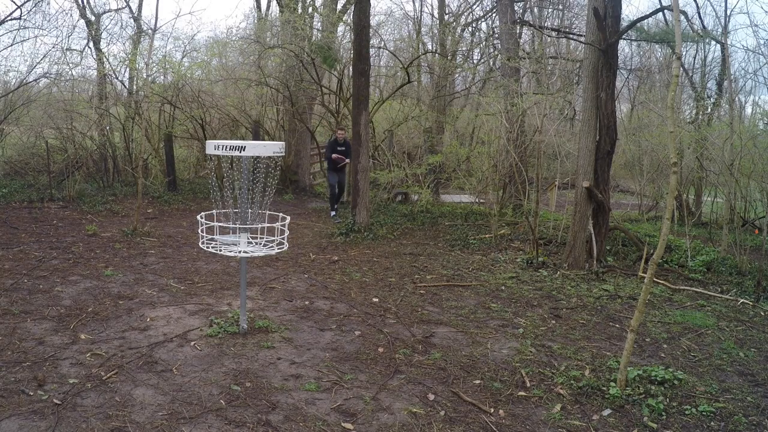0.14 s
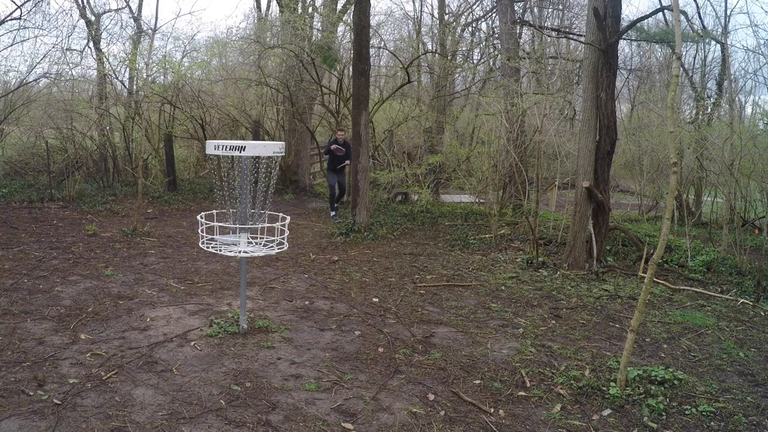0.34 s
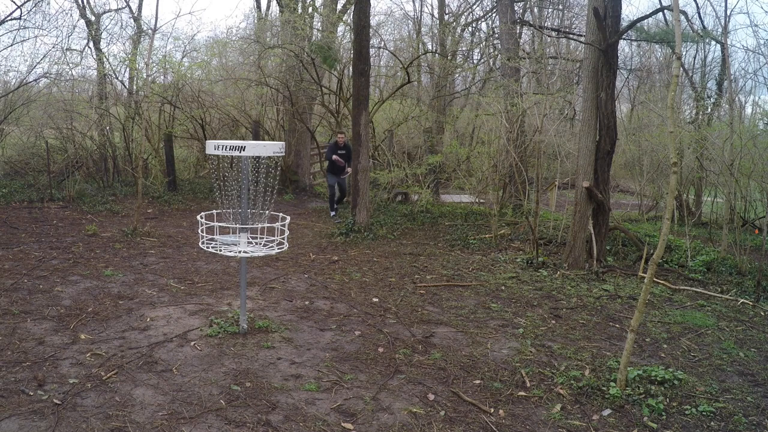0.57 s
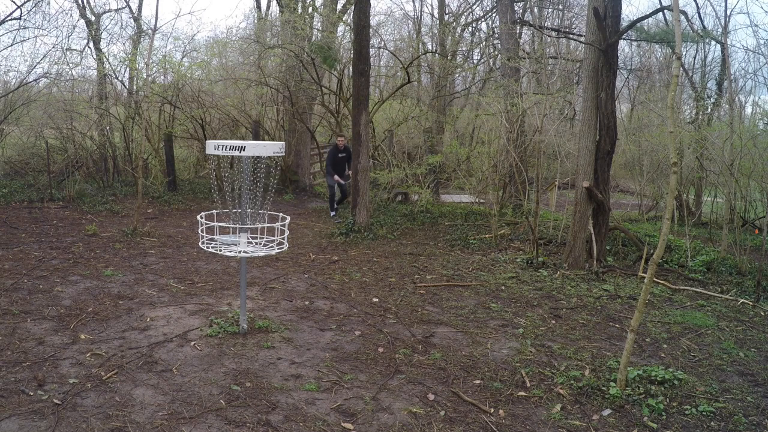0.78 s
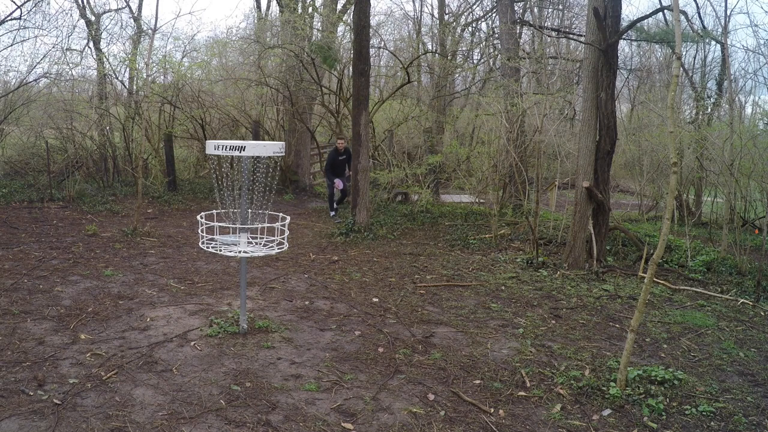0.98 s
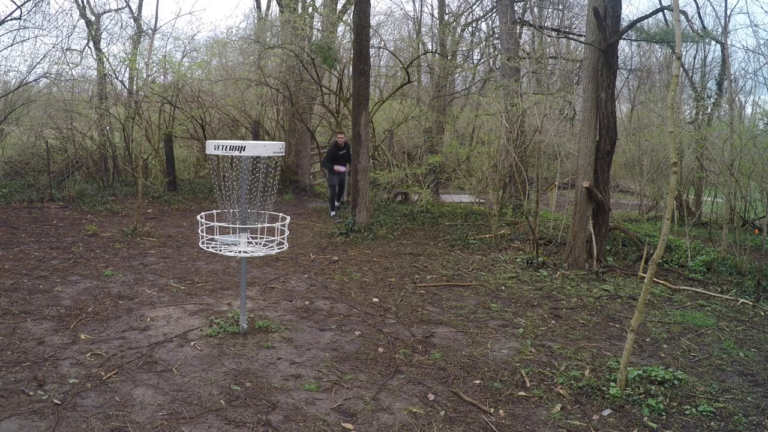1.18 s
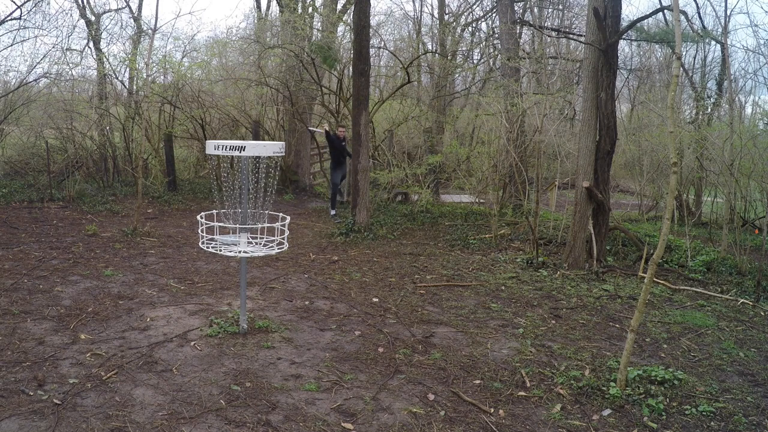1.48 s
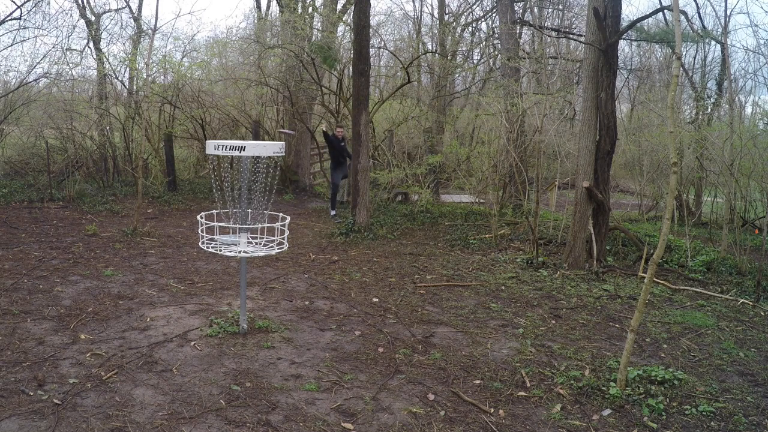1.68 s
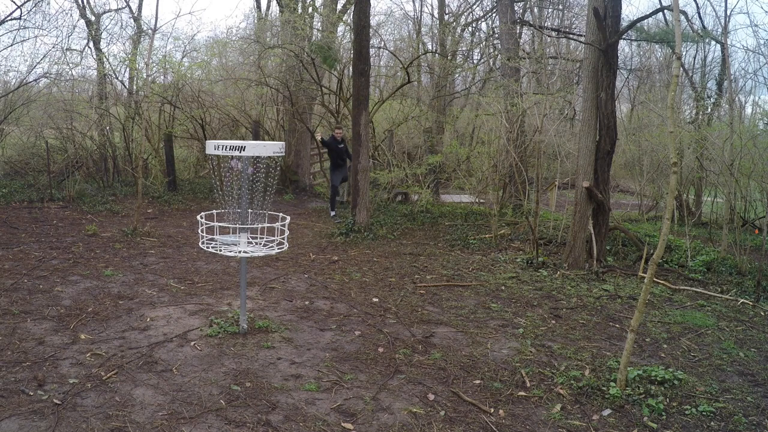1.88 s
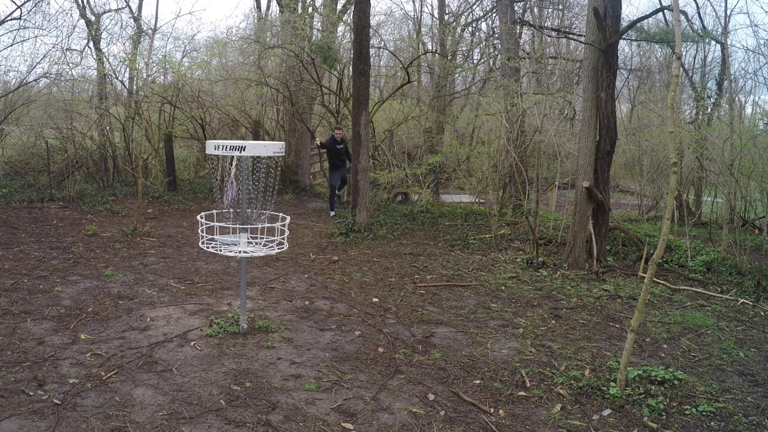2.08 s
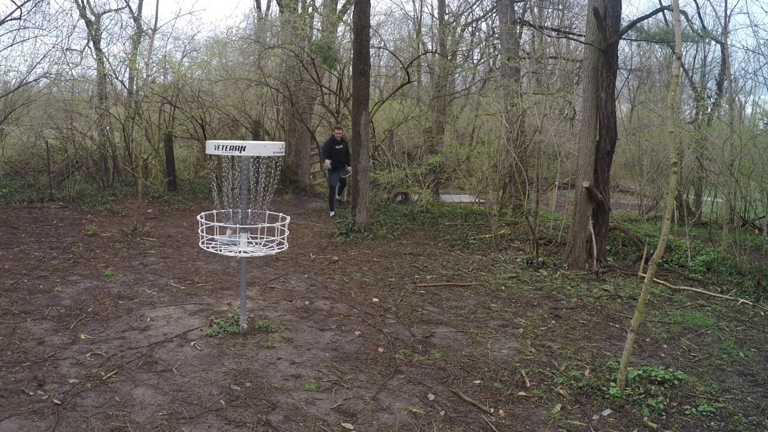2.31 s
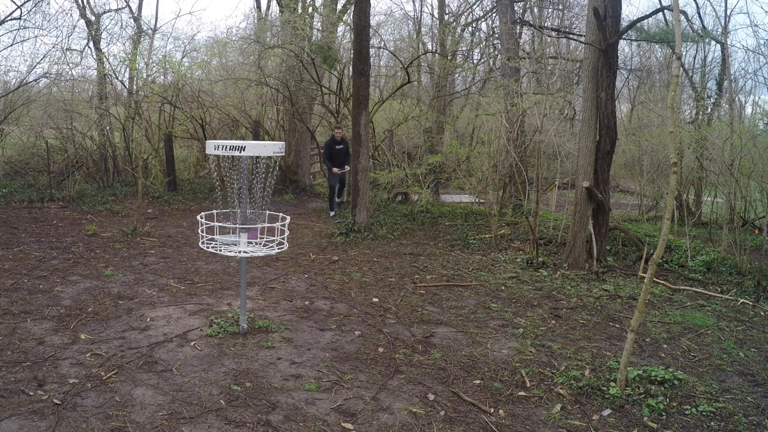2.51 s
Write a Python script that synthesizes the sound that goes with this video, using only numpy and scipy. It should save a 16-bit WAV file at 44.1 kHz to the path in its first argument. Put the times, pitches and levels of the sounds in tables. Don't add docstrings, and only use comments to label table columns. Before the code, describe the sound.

A plastic disc hits the steel chains of a basket with a sharp clashing jangle, knocks down into the tray and settles; before it, faint chain ticks and distant birds in a wood, microphone near the basket.

```python
import sys
import numpy as np
from scipy import signal
from scipy.fft import rfft, irfft, next_fast_len
from scipy.io import wavfile
from scipy.ndimage import map_coordinates

SR = 44100
rng = np.random.default_rng(int(sys.argv[2]) if len(sys.argv) > 2 else 0)


def volts_from_db(level):
    exponent = np.asarray(level, float) / 20
    return 10 ** exponent


def generate_wav(signal):
    frames = np.transpose(np.atleast_2d(signal))
    scaled = np.clip(frames, -1, 1) * 32767
    pcm = np.round(scaled).astype(np.int16)
    wavfile.write(sys.argv[1], SR, pcm)


N = 116865

LINK_HZ = [7830, 8250, 8620, 9080]
BRIGHT_HZ = [12700, 13450, 14500]
HOOK_HZ = [9860, 14500]
RING_HZ = [6790, 6910, 7050, 8750]
# (spread between pieces [Hz], level [dB], t60 [s])
LINK = [(67, 8, 0.046), (193, -4, 0.066), (98, 3, 0.018), (119, -6, 0.035)]
BRIGHT = [(364, -6, 0.04), (257, -5, 0.039), (110, -1.5, 0.042)]
HOOK = [(69.5, -2.3, 0.095), (70.4, -0.61, 0.062)]
RING = [(55.6, -26, 0.57), (50, -6, 0.063), (38, 6.5, 0.022), (199, -16, 0.074)]
# (frequency [Hz], density [dB per Hz])
CRACK = [(1500, -24), (2400, -4.5), (6400, -2), (8300, -2), (10500, -9), (13500, -6), (15300, -28)]
CRACK_T60_S = 0.018
RISE_S = 0.0009


def unit(x):
    return x / np.sqrt(np.mean(x ** 2) + 1e-20)


def along(points, hz):
    f, v = np.transpose(points)
    return np.interp(np.log(hz + 1), np.log(f + 1), v)


def curves(rows, t):
    s, *cols = np.transpose(rows)
    return [np.interp(t, s, c) for c in cols]


def wander(t, per_s, knots):
    return map_coordinates(rng.standard_normal(knots), [t * per_s])


def noise(spectrum, size):
    z = rfft(rng.standard_normal(next_fast_len(size + 8192)))
    hz = np.linspace(0, SR / 2, len(z))
    return unit(irfft(z * volts_from_db(along(spectrum, hz))))[:size]


def impulses_at(s):
    return np.clip(s * SR, 0, N - 1).astype(int)


def bursts(rows, count=3, gap_s=0.003, fade_db=4):
    s, *levels = np.transpose(rows)[:, :, None]
    luck, k = rng.random((len(rows), 2, count)), np.arange(count)
    late = np.cumsum(2 * gap_s * luck[:, 0] * (k > 0), axis=1)
    weaker_db = fade_db * k + 6 * luck[:, 1] * (k > 0)
    return [(s + late).ravel()] + [(db - weaker_db).ravel() for db in levels]


def struck(hz, modes, s, db, count=12, flutter_db=5):
    flutters_per_s, strike_db = 120, 2
    hz, spread, level, t60 = np.vstack([hz, np.transpose(modes)]).astype("f")[:, None, :, None]
    t = np.arange(SR // 3, dtype="f") / SR
    level_luck, pitch_luck, decay_luck = rng.standard_normal((3, count, len(modes), 1), "f")

    knots = rng.standard_normal((count, len(modes), SR // 1000), "f")
    at = t * flutters_per_s
    i, part = at.astype(int), at % 1
    flutter = knots[..., i] * (1 - part) + knots[..., i + 1] * part

    decay_db = 60 * t / (t60 * volts_from_db(decay_luck))
    mode_db = level + strike_db * level_luck + flutter_db * flutter - decay_db
    tone = np.sin(np.float32(2 * np.pi) * (hz + spread * pitch_luck) * t)
    rings = (np.exp(np.float32(np.log(10) / 20) * mode_db) * tone).sum(axis=1)
    rings = rings * (1 - np.exp(-t / RISE_S)) * (1 - (t / t[-1]) ** 2)
    rings = rings / np.abs(rings).max(axis=1)[:, None]

    blows, m = np.zeros((count, N)), next_fast_len(N + SR // 3)
    np.add.at(blows, (np.arange(len(s)) % count, impulses_at(s)), volts_from_db(db))
    return irfft((rfft(blows, m) * rfft(rings, m)).sum(axis=0), m)[:N]


def cracks(s, db, t60, spectrum):
    blows = np.bincount(impulses_at(s), volts_from_db(2 * db), N)
    power = signal.fftconvolve(blows, volts_from_db(-120 * np.arange(SR // 4) / SR / t60))[:N]
    return np.sqrt(np.abs(power)) * noise(spectrum, N)


def link_ticks():
    early = [(0.001, -35.5, -64, -50), (0.0333, -37.5, -60, -55), (0.0662, -33, -51, -43),
             (0.1111, -35, -56, -39), (0.1441, -43, -61, -47), (0.2329, -45.5, -69, -55),
             (0.2897, -52, -75, -58), (0.3207, -46.5, -70, -46), (0.3636, -45, -76, -47),
             (0.3865, -28, -61, -32), (0.401, -29, -50, -33), (0.5407, -49, -70, -48),
             (0.5511, -52, -72, -47), (0.561, -33, -66, -50), (0.5686, -34, -56, -39.5),
             (0.6015, -44, -59, -39), (0.623, -27, -79, -48), (0.634, -34, -73, -43),
             (0.6709, -39, -69, -40), (0.7741, -45, -53, -46), (0.827, -52, -78, -63),
             (0.8425, -42.5, -78, -53), (0.8994, -56, -80, -55), (1.0151, -51, -81, -64),
             (1.255, -44.5, -61, -47), (1.28, -40.5, -72, -46), (1.3009, -40.5, -50.5, -39.5),
             (1.3124, -35.5, -65, -42), (1.331, -59, -70, -52), (1.3508, -43.5, -77, -52),
             (1.4277, -51.5, -55.5, -50), (1.44, -65, -73, -56), (1.4775, -41, -55, -56),
             (1.7529, -51, -79, -54), (1.8267, -65, -66, -65)]
    late = [(1.8954, -15, -58, -23), (1.9332, -2, -35, -26), (1.9417, -7.5, -33, -16),
            (1.958, -14, -23, -20), (1.971, -6, -41, -16), (2.0255, -20, -26, -9), (2.032, -10, -25, -8),
            (2.0719, -7.5, -31, -19), (2.1383, -10, -35, -19.5), (2.1683, -33, -41, -17.5),
            (2.185, -18, -36, -43), (2.2126, -12.5, -39, -12), (2.2335, -49, -66, -46),
            (2.2495, -26, -50, -18), (2.2711, -26, -56, -17.5), (2.297, -24, -42, -44),
            (2.3324, -18.5, -46, -23), (2.347, -31, -37, -21), (2.3593, -20, -45, -22),
            (2.3837, -16.5, -39, -14.5), (2.4306, -30, -39.5, -26.5), (2.478, -34, -58, -36),
            (2.492, -27, -48, -43), (2.4965, -27, -34.5, -30), (2.5075, -20, -42, -39),
            (2.5154, -16.5, -43, -23.5), (2.535, -38, -43, -32), (2.555, -47, -52, -35),
            (2.569, -59, -52, -64), (2.6015, -36, -50, -46), (2.6358, -28, -68, -39)]
    s, link, hook, bright = bursts([*early, *late])
    out = struck(LINK_HZ, LINK, s, link - 11, count=11)
    out = out + struck(HOOK_HZ, HOOK, s, hook, count=7)
    out = out + struck(BRIGHT_HZ, BRIGHT, s, bright - 11, count=10)
    return out + cracks(s, bright - 15.5, CRACK_T60_S, CRACK)


def frame_clashes():
    # (time [s], ring [dB], pole [dB], crack [dB])
    clashes = [(0.001, -58, -50, -57), (0.0124, -37.5, -48, -53.5), (0.0652, -29.5, -48.5, -42),
               (0.385, -22, -45.5, -38.5), (0.4, -34.5, -52, -45), (0.606, -61, -68, -55),
               (0.6265, -42, -51.5, -49), (0.639, -46, -61, -54), (0.7105, -42, -66, -58.5),
               (0.794, -50, -68, -69), (1.8, -53, -83, -60), (1.8955, -23, -38, -30),
               (1.9344, -29, -37, -52), (1.943, -21, -42, -25), (1.9899, -22, -26.5, -32),
               (2.0255, -13, -43, -27.5), (2.035, -12, -35.5, -25.5), (2.094, -40, -33, -33),
               (2.168, -14, -36, -33), (2.2135, -16, -33.5, -38.5), (2.2715, -23.5, -41.5, -44),
               (2.3198, -30, -43.5, -36), (2.3328, -25, -36, -58), (2.3593, -20, -70, -62),
               (2.3835, -19, -37.5, -33), (2.4635, -66, -46.5, -34.5), (2.508, -45, -49.5, -42.5)]
    pole_hz = [2424, 2490, 2628]
    rods_hz = [2730, 3350, 4020, 4740, 5800]
    # (spread [Hz], level [dB], t60 [s])
    pole_modes = [(5, 0, .4), (6, -3, .4), (6, -14, .3)]
    rod_modes = [(70, -4, .05), (35, -4, .055), (35, 0, .07), (80, -3, .05), (90, -4, .05)]
    # (frequency [Hz], density [dB per Hz])
    bang = [(150, -69), (250, -9.5), (1580, -5.5), (4140, -2), (6360, -7.5), (7050, 1.5), (15300, -26.5)]
    s, ring, pole, crack = bursts(clashes)
    first = slice(None, None, 3)
    out = struck(RING_HZ, RING, s, ring - 6, count=10)
    out = out + struck(pole_hz, pole_modes, s[first], pole[first] + 1.5, count=7, flutter_db=3.5)
    out = out + struck(rods_hz, rod_modes, s, crack + 3.5, count=10)
    out = out + cracks(s[first], crack[first] - 6.5, 0.12, bang)
    return out + cracks(s, crack + 3.5, 0.012, bang)


def jangle():
    # (time [s], links [dB], rings [dB], clatter [dB])
    shake = [(1.897, -45, -42, -30.5), (1.92, -25.5, -28, -30.5), (1.944, -21, -18, -31),
             (1.975, -28.5, -36, -32.5), (2.012, -23.5, -25.5, -34.5), (2.035, -29, -34, -33),
             (2.1, -31, -36, -40.5), (2.2, -33.5, -49, -45.5), (2.3, -56, -68, -55),
             (2.45, -47.5, -50, -55), (2.65, -69, -65, -64.5)]
    contacts_per_s, start = 700, shake[0][0]
    s = start + np.cumsum(rng.exponential(1 / contacts_per_s, 900))
    s = s[s < N / SR]
    db = np.zeros(len(s))
    link, ring, clatter = curves(shake, np.arange(N) / SR)
    layers = [
        (struck(LINK_HZ + BRIGHT_HZ, LINK + BRIGHT, s, db), link - 1),
        (struck(RING_HZ, RING, s[::2], db[::2], count=9), ring - 2.5),
        (cracks(s, db, CRACK_T60_S, CRACK), clatter + 3.5),
        (struck(HOOK_HZ, HOOK, s[::3], db[::3], count=7), link - 13),
    ]
    return sum(x / x[int(start * SR):].std() * volts_from_db(level) for x, level in layers)


def disc():
    # (time [s], peak [dB], body pitch [Hz])
    knocks = [(1.183, -51, 1530), (1.897, -19.5, 1520), (1.917, -38, 1300), (1.934, -24, 980),
              (1.965, -25, 683), (2.025, -30, 1110), (2.093, -36, 1330), (2.146, -30.5, 1170),
              (2.32, -27.5, 345), (2.385, -37, 810), (2.406, -31.5, 950), (2.464, -42, 2900),
              (2.51, -37.5, 325), (2.53, -44, 88), (2.557, -33.5, 1030), (2.642, -42, 720)]
    # (time [s], level [dB])
    scrape = [
        (1.9, -32.5),
        (1.96, -35.5),
        (2.05, -46.5),
        (2.2, -53),
        (2.65, -57.5),
    ]
    # (frequency [Hz], density [dB per Hz])
    plastic = [(120, -57), (250, -6), (450, -4.5), (800, 7), (1600, 4), (2300, -2.5), (3500, -6.5),
               (7000, -73)]
    knock_cycles, snap_db, snap_t60_s, lumps_db = 8, -4.5, 0.033, 2.5
    out, t = np.zeros(N + SR), np.arange(SR // 10) / SR
    for s, db, hz in knocks:
        body = np.sin(2 * np.pi * hz * t) * volts_from_db(-60 * t * hz / knock_cycles)
        snap = volts_from_db(snap_db - 60 * t / snap_t60_s) * noise(plastic, len(t))
        out[int(s * SR):][:len(t)] += volts_from_db(db) * (1 - np.exp(-t / RISE_S)) * (body + snap)
    t = np.arange(N) / SR
    rub_db = curves(scrape, t)[0] - 1.5 + lumps_db * wander(t, 120, 400)
    return out[:N] + (t > knocks[1][0]) * volts_from_db(rub_db) * noise(plastic, N)


def birds():
    # (time [s], length [s], start [Hz], end [Hz], level [dB])
    whistles = [
        (0.266, 0.29, 3870, 3960, -68.5),
        (0.535, 0.087, 1993, 1954, -61.5),
        (0.539, 0.098, 4050, 4000, -68.5),
        (0.547, 0.23, 5900, 5900, -81),
        (0.85, 0.13, 2270, 2260, -67),
        (0.868, 0.15, 3670, 3630, -71.5),
        (0.935, 0.17, 4250, 4350, -77),
        (0.946, 0.031, 3610, 3590, -63),
        (1.045, 0.052, 3750, 3430, -71.5),
    ]
    warble_db = 4
    out, t = 0, np.arange(N) / SR
    for s, length, hz, end_hz, db in whistles:
        u = np.clip((t - s) / length, 0, 1)
        swell = np.sqrt(np.abs(np.sin(np.pi * u)))
        tone = np.sin(2 * np.pi * np.cumsum(hz + (end_hz - hz) * u) / SR)
        out = out + volts_from_db(db + warble_db * wander(t, 60, 200)) * swell * tone
    return out


def trees(x):
    # (frequency [Hz], t60 [s])
    decay = [(300, 0.25), (3000, 0.22), (12000, 0.24)]
    hz, t, z = signal.stft(rng.standard_normal(SR // 2), SR, nperseg=256)
    tail = signal.istft(z * volts_from_db(-60 * t / along(decay, hz)[:, None]), SR, nperseg=256)[1]
    delayed = np.pad(x, (300, 0))
    return signal.fftconvolve(delayed, tail / np.linalg.norm(tail))[:N]


def air():
    # (frequency [Hz], density [dB per Hz])
    rumble = [(25, 1), (60, 0), (164, -8.5), (340, -14), (700, -12.5), (1100, -15.5), (3200, -26),
              (15500, -36.5)]
    # (time [s], width [s], pressure [full scale])
    gusts = [
        (0.138, 0.039, 0.017),
        (0.347, 0.048, -0.023),
        (1.018, 0.1, 0.0083),
        (1.149, 0.063, -0.0074),
    ]
    hum_hz, hum_db, hum_ends_s = 161, -65.5, 1.5
    t = np.arange(N) / SR
    hum = volts_from_db(hum_db + 2 * wander(t, 10, 40)) * np.sin(2 * np.pi * hum_hz * t)
    hum = hum / (1 + (t / hum_ends_s) ** 8)
    wind = sum(p * np.exp(-0.5 * ((t - s) / w) ** 2) for s, w, p in gusts)
    return volts_from_db(-58.5 + 0.077 * wander(t, 3, 40)) * noise(rumble, N) + hum + wind


def scene():
    near = link_ticks() + frame_clashes() + jangle() + disc() + birds()
    return (near + volts_from_db(-8) * trees(near) + air())[None]


def band_limit(x):
    return signal.sosfilt(signal.butter(12, 16200, fs=SR, output="sos"), x)


def record(dry):
    top_hz = 15330
    m = next_fast_len(N + 8192)
    hz = np.fft.rfftfreq(m, 1 / SR)
    gain = np.clip((top_hz + 60 - hz) / 120, 0.006, 1)
    mix = irfft(rfft(dry, m) * gain, m)[:, :N]
    return band_limit(mix)


dry = scene()
out = record(dry)
generate_wav(out)
```